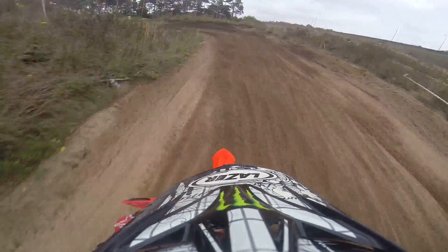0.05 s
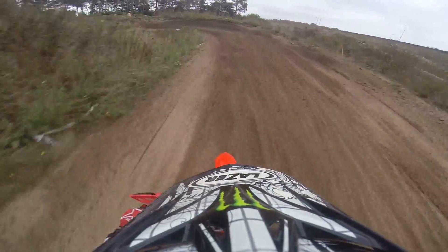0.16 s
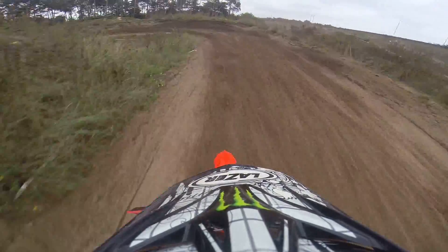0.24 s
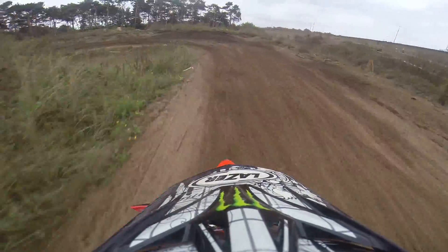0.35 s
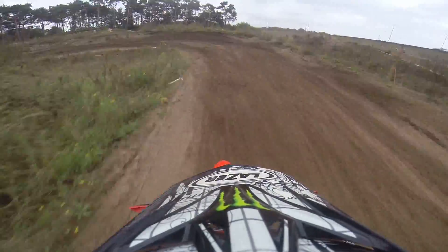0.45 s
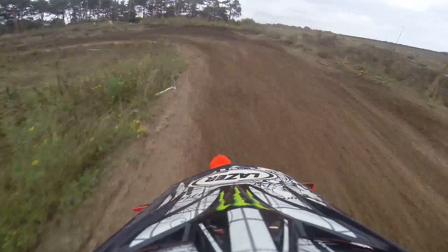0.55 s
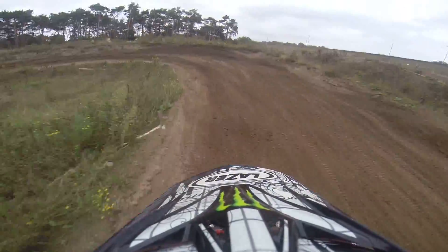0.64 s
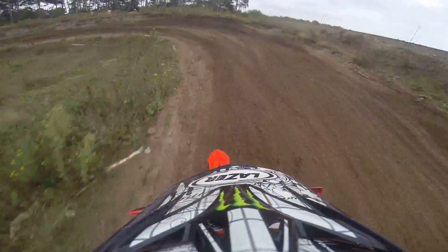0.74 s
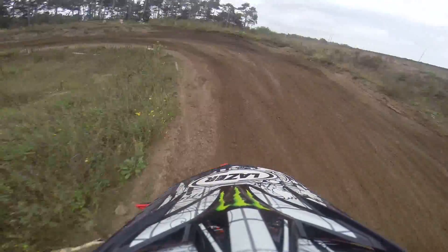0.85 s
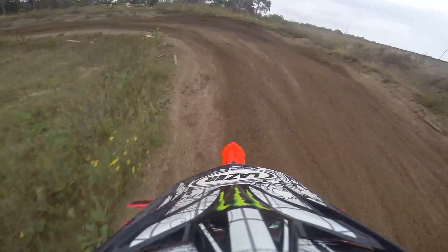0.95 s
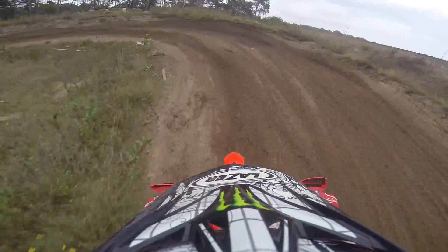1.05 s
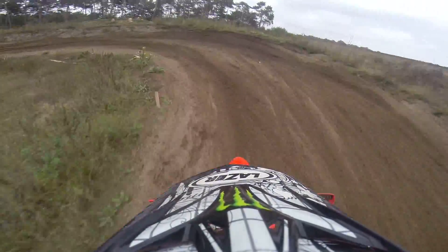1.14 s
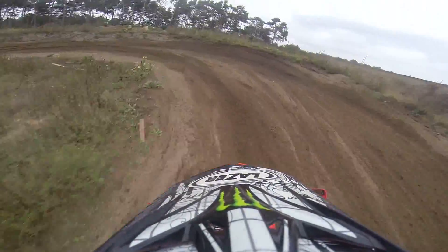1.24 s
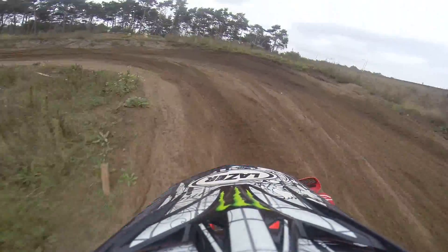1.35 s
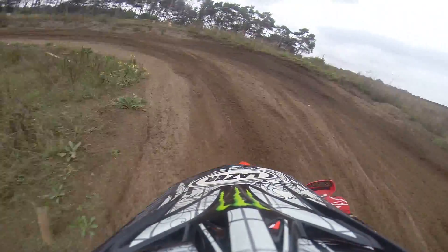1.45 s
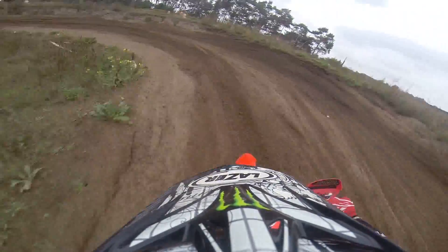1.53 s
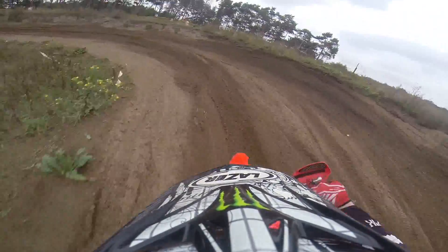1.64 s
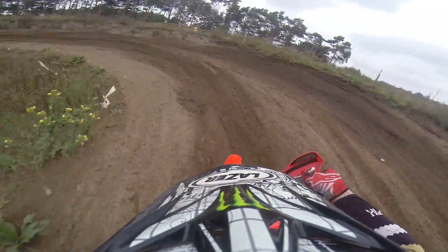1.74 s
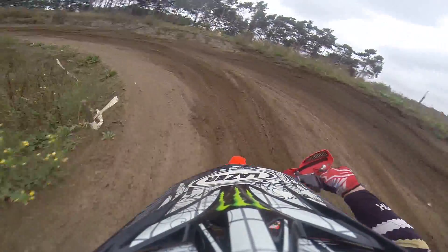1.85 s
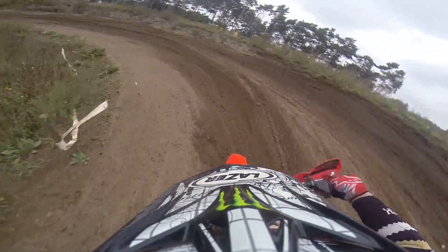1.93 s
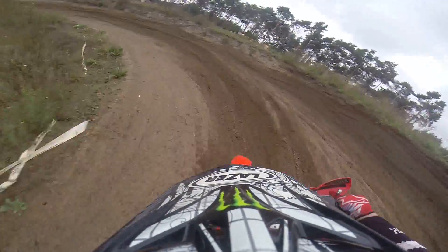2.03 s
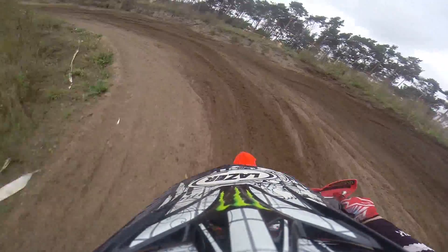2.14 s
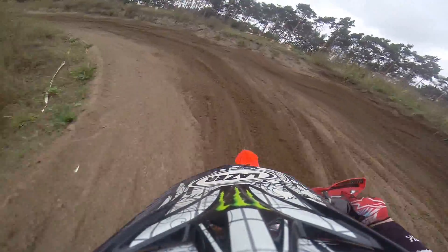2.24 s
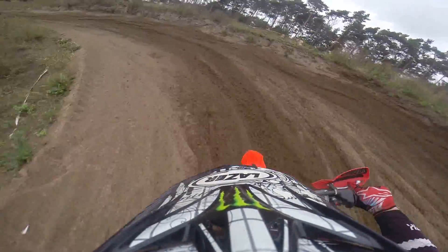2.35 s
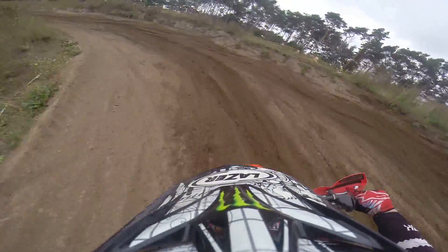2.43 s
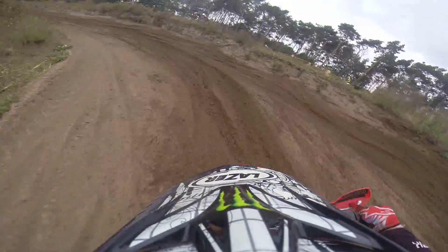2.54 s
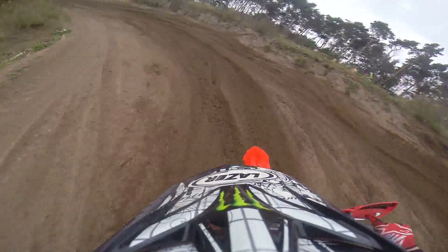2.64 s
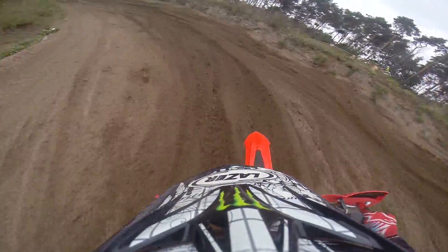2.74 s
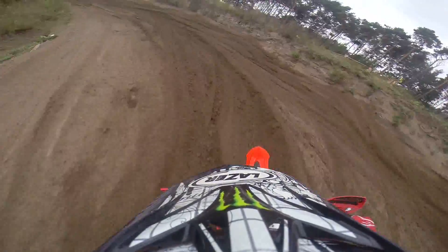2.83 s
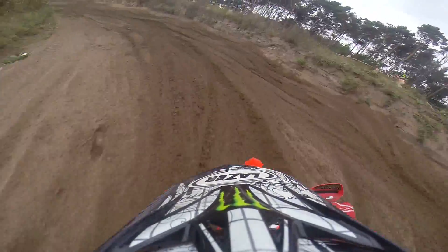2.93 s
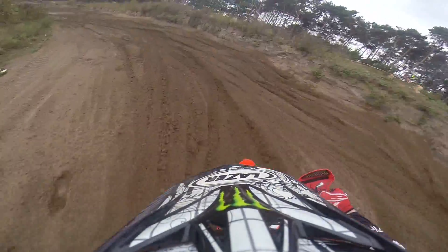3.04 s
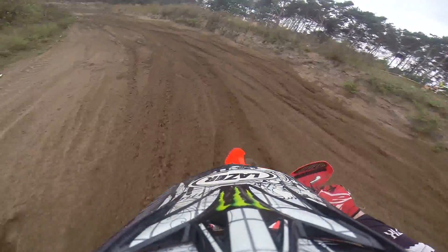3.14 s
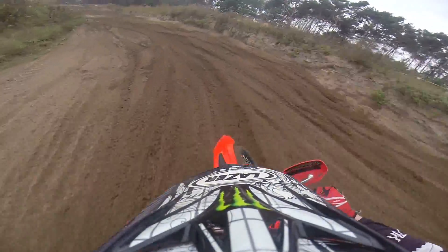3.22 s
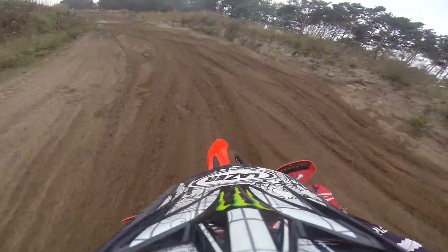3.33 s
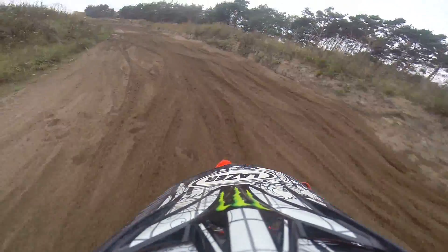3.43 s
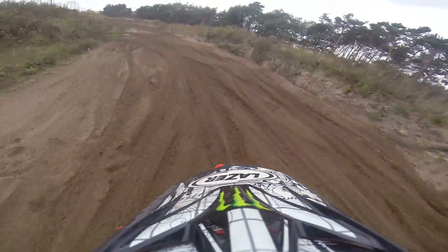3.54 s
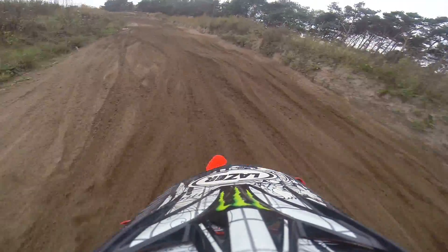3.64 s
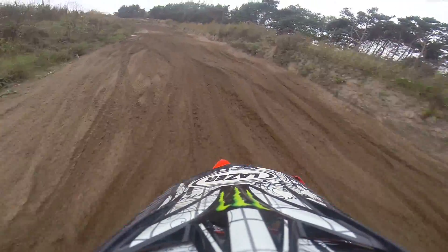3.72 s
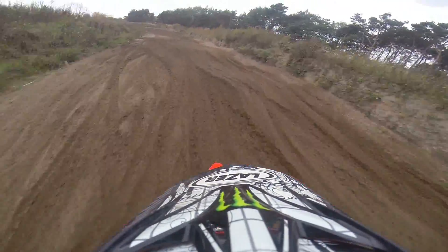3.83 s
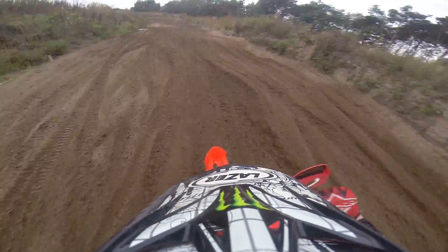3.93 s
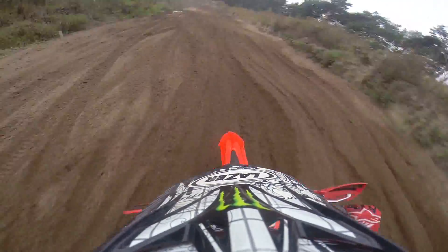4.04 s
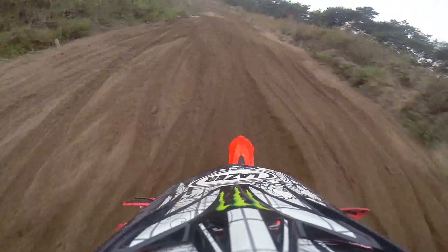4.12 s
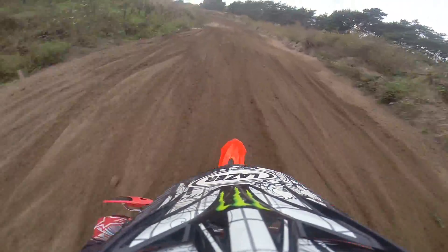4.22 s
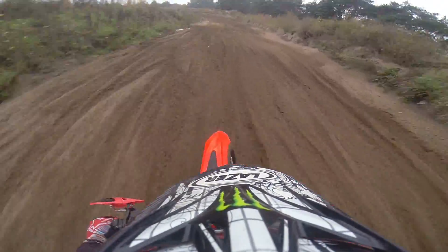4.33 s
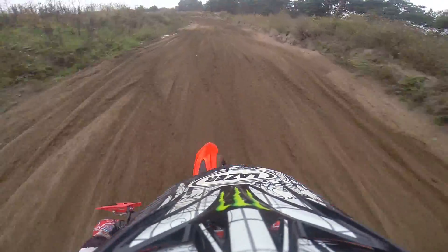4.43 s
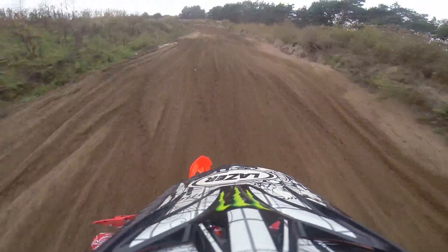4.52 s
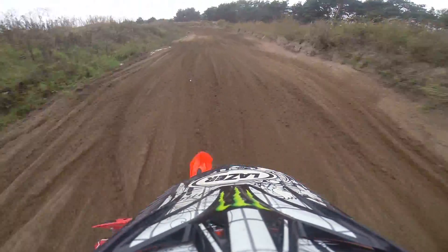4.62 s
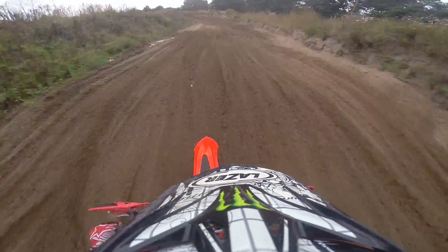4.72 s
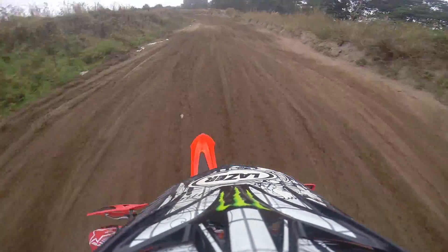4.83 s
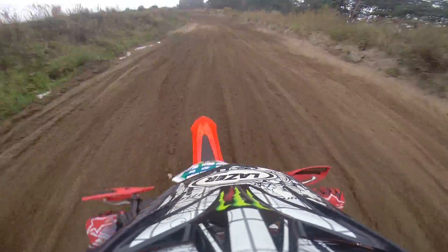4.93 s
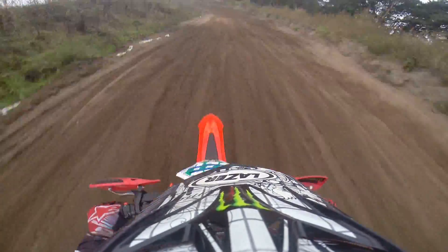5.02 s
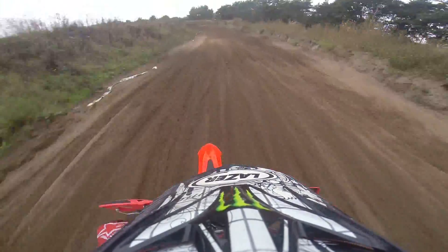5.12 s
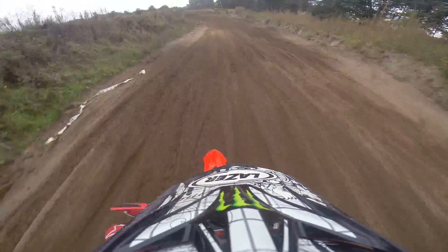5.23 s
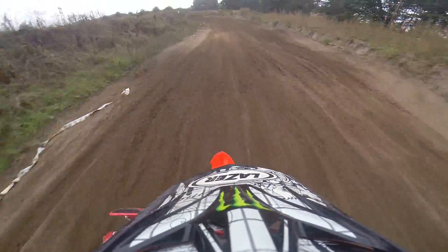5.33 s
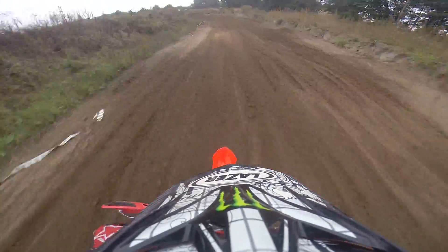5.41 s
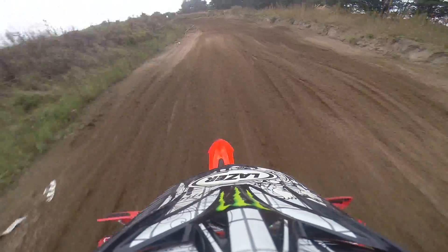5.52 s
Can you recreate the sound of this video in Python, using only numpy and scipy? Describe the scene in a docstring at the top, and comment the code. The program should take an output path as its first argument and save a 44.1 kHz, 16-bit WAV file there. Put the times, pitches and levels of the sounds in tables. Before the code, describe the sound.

Dirt bike coasts into a sandy bend amid gusting wind, pops and blips its throttle, then pulls hard up a straight with climbing revs.

```python
"""A single-cylinder dirt bike rides through a sandy bend, heard at the rider's helmet.
First the engine coasts with a rattling chain while filtered noise makes gusty wind and the rush of the ground.
A bump throws up a burst of grit, then stray firings pop from the silencer, each followed by an airbox gulp.
Two blips of throttle follow, with pops after each: every turn rings the airbox and sends a pulse down the pipe.
Last comes a long pull up the straight, which ends with intake hiss and a clean whine at high revs."""
import sys
import numpy as np
from scipy import signal
from scipy.fft import rfft, irfft, next_fast_len
from scipy.io import wavfile

SR = 44100
rng = np.random.default_rng(int(sys.argv[2]) if len(sys.argv) > 2 else 0)


def pcm_store(signal):
    """Save signal as 16-bit PCM."""
    levels = np.round(np.clip(np.atleast_2d(signal), -1, 1) * 32767)
    wavfile.write(sys.argv[1], SR, levels.astype(np.int16).T)


N = 245637
TIME = np.arange(N) / SR


def amp(db):
    """Turns dB into a linear gain."""
    return 10 ** (np.asarray(db) / 20)


def unit(x):
    """Scales a signal to rms 1."""
    return x / np.sqrt(np.mean(x ** 2) + 1e-20)


def curve(rows, axis=1):
    """Draws one column of a table as straight lines over the whole scene."""
    rows = np.asarray(rows)
    return np.interp(TIME, rows[:, 0], rows[:, axis])


def read(points, hz):
    """Reads a spectrum in dB, interpolated on a logarithmic frequency scale."""
    f, db = np.transpose(points)
    return np.interp(np.log(hz + 1), np.log(f), db)


def colour(x, points):
    """Shapes the spectrum without delay."""
    size = next_fast_len(len(x) + 4096)
    gain = amp(read(points, np.fft.rfftfreq(size, 1 / SR)))
    return irfft(rfft(x, size) * gain, size)[:len(x)]


def ring(points, hz, lift_db=0):
    """Causal (minimum-phase) response with the given spectrum, read at the frequencies hz; one row per pulse."""
    log_gain = np.log(amp(read(points, hz) + lift_db))
    circle = np.concatenate([log_gain, log_gain[..., -2:0:-1]], axis=-1)
    return np.exp(signal.hilbert(circle).conj())[..., :hz.shape[-1]]


def noise(points):
    """Steady noise of rms 1 with the given spectrum."""
    return unit(colour(rng.standard_normal(N), points))


def wander(hz):
    """Slow random drift of rms 1, mostly below hz."""
    lowpass = 1 + (np.fft.rfftfreq(N, 1 / SR) / hz) ** 4
    return unit(irfft(rfft(rng.standard_normal(N)) / lowpass, N))


def clicks(times, sizes):
    """Impulses shared between the two nearest samples."""
    at = np.clip(np.asarray(times) * SR, 0, N - 1)
    low = at.astype(int)
    early = np.bincount(low, sizes * (1 - at % 1), N + 1)
    late = np.bincount(low + 1, sizes * (at % 1), N + 1)
    return (early + late)[:N]


# Openings of the throttle. Each row: start of opening in seconds, fully shut in seconds, whoop peak in dB.
PULLS = [(1.687, 2.13, -14), (2.339, 2.715, -18.5), (2.994, 5.7, -11.5)]


def throttle(open_s=0.054, shut_s=0.083):
    """How far the throttle is open, 0-1, with a ramp at each end."""
    return sum(np.clip(np.minimum((TIME - start) / open_s, (end - TIME) / shut_s), 0, 1)
               for start, end, *_ in PULLS)


# Strength of the headwind, dropping into the bend and building along the straight.
# Each row: time in seconds, strength in dB, which each layer of wind or ground scales its own way.
HEADWIND = [(0, 1), (.45, -1.5), (.62, 1), (.66, 2.5), (.85, -4.5), (1.3, -6.5), (1.52, -4.5), (2.25, -7.5),
            (2.62, -5), (2.74, -9.5), (2.98, -7.5), (3.35, -4), (3.75, -5.5), (5.57, -3.5)]
# Gusts and lulls in the buffeting. Each row: centre in seconds, half width in seconds, boost or cut in dB.
GUSTS = [(.1, 0.14, 4.5), (0.3, 0.04, 9.5), (.54, 0.016, 10.5), (.675, .025, 5), (1.136, 0.036, 11),
         (1.8, 0.071, -22), (2.28, 0.012, 4), (3.2, 0.2, -12.5), (3.85, 0.24, -9.5), (4.55, 0.37, -3.5),
         (5.48, .12, -5.5)]
# Spectra of the low buffeting and the roar. Each row: frequency in Hz, relative level in dB.
BUFFET = [(15, -6.5), (30, -2.5), (60, 2), (110, 0.5), (170, -5), (260, -10), (500, -29), (1200, -76)]
ROAR = [(80, -15), (180, -3), (290, 1), (420, -5.5), (600, -2.5), (800, -7.5), (1050, -11.5), (1400, -17.5),
        (1800, -46), (4000, -74.5)]
# Narrow whistles round the helmet peak. Each row: frequency in Hz, width in Hz, level in dB against the roar.
WHISTLES = [(1046, 41, -21), (2590, 300, -26), (5800, 440, -42.5)]


def wind(buffet_db=-20.5, roar_db=-21.5, buffet_by_wind=0.91, roar_by_wind=0.97, lumps_db=0.5, gusts_db=1.0):
    """Eddies thump the microphone, roar round the helmet and whistle at its edges."""
    roar_by_throttle_db = -4  # the roar is softer while the throttle is open, leaving the engine clear
    headwind = curve(HEADWIND)
    gusts = sum(db * np.exp(-((TIME - s) / width) ** 2) for s, width, db in GUSTS)
    buffet = unit(noise(BUFFET) * amp(lumps_db * wander(25)))
    buffet *= amp(buffet_db + buffet_by_wind * headwind + gusts)
    roar = unit(noise(ROAR) * amp(gusts_db * wander(41)))
    for hz, width, db in WHISTLES:
        peak = signal.iirpeak(hz, hz / width, fs=SR)
        roar += amp(db) * unit(signal.lfilter(*peak, rng.standard_normal(N)))
    return buffet + roar * amp(roar_db + roar_by_wind * headwind + roar_by_throttle_db * throttle())


# Spectra of the tyre and air rush and of the finer sand fizz, both including some engine hiss.
# Each row: frequency in Hz, relative level in dB.
RUSH = [(700, -1.5), (1300, 0.5), (1800, 3.5), (2200, 1.5), (2600, -6), (3200, -3), (3900, -6.5),
        (4700, -22.5), (7000, -55)]
FIZZ = [(3000, -9), (4200, -0.5), (4900, -5.5), (5700, -4), (6600, -3), (7400, -14), (9500, -19.5),
        (12500, -27.5), (15000, -43.5)]


def ground(rush_db=-39.0, fizz_db=-48, rush_by_wind=1.45, fizz_by_wind=2.09, open_throttle_db=2.0,
           flutter_db=1.1, grains_per_s=900, grain_spread_db=10, grain_share=0.18):
    """Tyres and air rush, sand fizzes on the plastics; both include engine hiss, up while the throttle is open."""
    headwind = curve(HEADWIND)
    flutter = amp(flutter_db * wander(68))
    sizes = amp(grain_spread_db * np.minimum(rng.exponential(1, N), 4)) * rng.choice([-1, 1], N)
    grains = unit(colour(sizes * (rng.random(N) < grains_per_s / SR), FIZZ))
    rush = unit(noise(RUSH) * flutter) * amp(rush_db + rush_by_wind * headwind)
    fizz = unit((noise(FIZZ) + grain_share * grains) * flutter) * amp(fizz_db + fizz_by_wind * headwind)
    return (rush + fizz) * amp(open_throttle_db * throttle())


# Burst of grit as the bike hits a bump. Each row: time in seconds, level in dB.
SPRAY_LEVEL = [(.62, -77), (.645, -42), (.66, -42), (.7, -50), (.76, -52), (.8, -75)]
# Spectrum of that grit. Each row: frequency in Hz, relative level in dB.
SPRAY = [(600, -9), (1100, 5), (2000, -1.5), (3300, 3.5), (5000, -14), (8000, -17), (12000, -21.5),
         (15000, -29)]


def spray(grains_per_s=700, spread_db=7):
    """Coarse grit strikes the plastics as random impulses of uneven size."""
    sizes = amp(spread_db * np.minimum(rng.exponential(1, N), 2.5)) * rng.choice([-1, 1], N)
    hits = sizes * (rng.random(N) < grains_per_s / SR)
    return unit(colour(hits, SPRAY)) * amp(curve(SPRAY_LEVEL))


# Short ticks: knocks, flung grit, and the sharp treble snap or ring of single firings.
# Each row: start in seconds, peak in dB, centre of the band in Hz, decay constant in seconds.
TICKS = [(0.171, -22.5, 4300, 0.0018), (.651, -14, 800, .003), (.66, -18, 1020, 0.011),
         (.654, -34, 10000, 0.0023), (.668, -34, 6000, 0.0027), (.693, -23, 3260, 0.0033),
         (0.758, -39, 10000, 0.0018), (.606, -51, 5000, 0.0026), (.647, -38, 3470, 0.019),
         (0.853, -27, 2120, 0.0044), (1.092, -24, 2000, 0.005), (1.152, -42, 5000, 0.005),
         (1.2581, -50, 6000, .006), (1.275, -29, 900, .003), (1.43, -40.5, 4500, .004),
         (1.432, -48, 9500, .003), (1.553, -47, 8900, .002), (1.598, -49, 9300, .002),
         (1.639, -46, 9500, .002), (1.535, -23.5, 1500, .004), (1.628, -36, 1950, .002),
         (1.667, -28, 1950, .002), (2.184, -48, 9500, .002), (2.218, -51, 9500, .002),
         (2.251, -50, 9500, 0.0018), (2.758, -47, 9000, 0.0012), (2.8535, -45, 5000, .002),
         (2.9094, -47, 7500, .003)]


def ticks():
    """Short, broadly tuned noise bursts that die at once."""
    out = np.zeros(N)
    for s, db, hz, decay in TICKS:
        burst = rng.standard_normal(N) * (TIME >= s) * np.exp(-abs(TIME - s) / decay)
        band = signal.butter(3, [hz / 1.3, hz * 1.3], "band", fs=SR, output="sos")
        tick = signal.sosfilt(band, burst)
        out += amp(db) * tick / abs(tick).max()
    return out


# Slack chain while the bike coasts. Each row: time in seconds, level in dB.
RATTLE_LEVEL = [(0, -35.5), (.4, -40), (.58, -37.5), (.67, -43), (.88, -44), (1.5, -48.5), (1.8, -71)]
# Ring of the chain. Each row: frequency in Hz, relative level in dB.
RATTLE = [(400, -14.5), (700, -3), (1050, 5.5), (1500, -6.5), (2000, -8), (2570, -2.5), (3100, -6),
          (4500, -18.5), (5800, -17.5), (9000, -29.5), (15000, -49.5)]


def rattle(knocks_per_s=260, spread_db=3.0, die_s=0.0054):
    """Coarse, uneven knocks of the slack chain, each a dying puff of noise."""
    sizes = amp(spread_db * np.minimum(rng.exponential(1, N), 3)) * (rng.random(N) < knocks_per_s / SR)
    decays = signal.lfilter([1], [1, -np.exp(-1 / (die_s * SR))], sizes)
    bursts = decays * rng.standard_normal(N)
    return unit(colour(bursts, RATTLE)) * amp(curve(RATTLE_LEVEL))


# Spectrum of one stray firing from the silencer. Each row: frequency in Hz, relative level in dB.
POP = [(40, -10.5), (150, 15.5), (280, 13), (550, 11), (680, 13.5), (830, -15), (1100, -13.5),
       (1420, -11.5), (1700, -33.5), (2050, -27.5), (2500, -37.5), (4000, -60.5)]


def exhaust(kicks, echo_s=0.00357, echo=0.79):
    """A short pop from the silencer and its reflection."""
    peak = colour(signal.unit_impulse(4096), POP).max()
    pulse = colour(kicks, POP) / peak
    return pulse + echo * np.interp(TIME - echo_s, TIME, pulse)


# Single hard firings, most of them with the throttle shut.
# Each row: time in seconds, relative level in dB, extra bass in dB, level of the following gulp in dB.
POPS = [(0.691, -13.5, 4, -28), (0.736, -20, 6, -14), (0.7576, -8.5, 8.5, -18), (0.7745, -3.5, 4, -20),
        (0.822, -5, 3.5, -18.5), (0.9675, -5.5, 4.5, -26), (1.147, -3.5, 2.5, -20), (1.396, -11.5, -6, -44),
        (1.43, -2, -2.5, -22), (1.508, -8.5, -2, -13), (1.5512, -0.5, -2, -8.5), (1.596, -0.5, -5, -12),
        (1.638, -2.5, -3.5, -11), (1.6757, -4.5, 0.5, -18), (1.7118, -6, -1, -15.5), (2.1135, -8, 0, -18),
        (2.1483, -4.5, -3.5, -23), (2.1837, -3.5, -1.5, -22), (2.2177, -3, -0.5, -23),
        (2.2495, -3, -0.5, -19), (2.3176, -6.5, 1, -13.5), (2.38, -6, -1, -28), (2.758, -12.5, 1, -35),
        (2.833, -8.5, 0, -22), (2.9082, -8, 4, -25), (2.982, -7, 2.5, -18), (3.0195, -3, -1, -31),
        (3.0616, -5, -2, -24)]


def overrun(pop_db=1.5, gulp_hz=305, gulp_lag_s=0.021, gulp_s=0.0086, crack_db=-34, crack_s=0.0024,
            clang_db=-26, clang_hz=1450, clang_s=0.0036):
    """Stray firings pop with a faint crack, the hardest make the pipe clang; about a turn later the airbox gulps."""
    s, db, bass_db, gulps_db = np.transpose(POPS)
    kicks = clicks(s, amp(db))
    lowpass = signal.butter(3, 400, fs=SR, output="sos")
    bass = signal.sosfiltfilt(lowpass, clicks(s, amp(db) * (amp(bass_db) - 1)))
    crack = signal.lfilter([1], [1, -np.exp(-1 / (crack_s * SR))], kicks)
    crack *= noise([(600, -19.0), (1500, 17.5), (4000, -0.5), (8000, -12), (12000, -25)])
    t = TIME[:SR // 10]
    clang = np.sin(2 * np.pi * clang_hz * t) * np.exp(-t / clang_s)
    clangs = signal.oaconvolve(clicks(s, amp(2 * db)), clang)[:N]  # doubled dB favours the hardest pops
    gulp = np.sin(2 * np.pi * gulp_hz * t) * np.exp(-((t - gulp_lag_s) / gulp_s) ** 2)
    gulps = signal.oaconvolve(clicks(s, amp(gulps_db)), gulp)[:N]
    return amp(pop_db) * exhaust(kicks + bass) + amp(crack_db) * crack + amp(clang_db) * clangs + gulps


def whoop(from_hz=350, to_hz=235, delay_s=0.021, length_s=0.0797):
    """As the throttle opens, the ring of the airbox swoops down."""
    out = np.zeros(N)
    for start, *_, db in PULLS:
        progress = np.clip((TIME - start - delay_s) / length_s, 0, 1)
        hz = from_hz + (to_hz - from_hz) * progress
        swell = np.sin(np.pi * progress ** 0.51)
        out += amp(db) * swell * np.sin(2 * np.pi * np.cumsum(hz) / SR)
    return out


def whine(turns, spectrum, count=60):
    """Clean orders of the crank: sines at whole multiples of its speed, shaped by a spectrum."""
    orders = sum(np.sin(2 * np.pi * (k * turns + rng.random())) for k in range(1, count))
    return unit(colour(orders, spectrum))


# How the engine breathes. Each row: time in seconds, intake in dB, exhaust in dB, exhaust lag in turns,
# airbox pitch factor, pipe pitch factor, rasp in dB (each layer scales the rasp its own way).
LOAD = [(1.7, 1, 3, 0.45, 0.96, 0.97, -13), (1.77, -6.5, 1.9, 0.42, 1.06, 0.96, -1.5),
        (1.9, 0.5, 1.3, 0.43, 1.005, 1, -4.6), (2.03, -2.5, -2, 0.46, 1.08, 0.94, -8),
        (2.1, 2.5, -8, 0.5, 1, 1.06, -7.5), (2.35, 0, -0.5, 0.39, 1.1, 1, -9),
        (2.42, -1.9, 1, 0.41, 0.91, 0.97, -3.2), (2.5, 1, 4, 0.36, 0.91, 0.92, -4),
        (2.57, -2, 1, 0.33, 1.07, 0.93, -1.5), (2.69, 0, -1.5, 0.39, 1.18, 1.05, -0.5),
        (3.02, -1.5, 3.5, 0.28, 0.97, 1.02, -5), (3.1, 0.7, 1.3, 0.43, 0.92, 0.88, -5),
        (3.2, -3.5, 2.7, 0.44, 1.02, 0.98, 1), (3.29, -1.5, 0.5, 0.4, 1.14, 0.96, -0.5),
        (3.36, -2, -0.5, 0.44, 1.27, 1.02, 2.5), (3.48, -2.5, 0.8, 0.45, 1.14, 1.04, -0.5),
        (3.56, 1, 1, 0.45, 0.99, 0.97, -2), (3.64, -2, 2.5, 0.43, 0.94, 0.94, -4.5),
        (3.74, -3, 0.5, 0.43, 0.97, 0.94, -3.5), (3.82, -0.5, 2.7, 0.37, 1, 1.04, 1.5),
        (3.9, 0.7, 0.5, 0.44, 1.11, 1.19, -3), (3.97, 0.3, -3, 0.5, 1.09, 1.24, 0),
        (4.12, -0.8, -5.5, 0.41, 1.21, 0.96, -8), (4.25, 0.7, -2, 0.397, 0.96, 0.954, -1.5),
        (4.44, 3.5, 2, 0.43, 1.02, 0.92, -7.5), (4.51, 3, 2.5, 0.44, 1.02, 0.99, 0),
        (4.6, 4.5, 0.5, 0.47, 0.96, 1.1, 1), (4.7, 3.5, -0.5, 0.43, 0.99, 1.04, 3.5),
        (4.84, 3, -9.5, 0.46, 1, 1.11, -0.5), (4.94, 2.5, -7, 0.5, 1.01, 1.12, -2.5),
        (5.06, 2.5, -12.5, 0.38, 0.97, 1.08, -4), (5.2, 3, -1.5, 0.44, 1, 0.97, -4),
        (5.33, 5.5, -1, 0.38, 0.96, 1.02, -1.5), (5.43, 4, -3, 0.39, 1, 0.96, -3),
        (5.55, 6.5, -1, 0.396, 1.006, 1.05, -4)]
# Overtones of the pipe's shell. Each row: frequency in Hz, relative level in dB.
SHELL = [(750, -31.5), (930, 1.5), (1080, 2), (1190, -0.5), (1330, 0), (1490, 1), (1620, -24.5),
         (1790, -10.5), (1890, -17), (2010, -11), (2200, -21), (2470, -13.5), (2700, -30.5), (5000, -49.5)]


def shell(turns, shell_db=-38, by_rasp=0.77):
    """The shell of the pipe sings along with the crank, louder with more rasp."""
    return whine(turns, SHELL) * amp(shell_db + by_rasp * curve(LOAD, axis=6))


# Engine speed. Each row: time in seconds, firings per second (one a turn).
SPEED = [(0, 76.3), (.78, 61.5), (1.55, 44), (1.7, 60.1), (1.72, 60.9), (1.75, 67.5), (1.78, 70.3),
         (1.88, 57.8), (2.05, 63.7), (2.11, 56.7), (2.35, 56.2), (2.39, 50.2), (2.42, 53.4), (2.5, 55.7),
         (2.56, 65.6), (2.59, 69.3), (2.69, 68.4), (3.03, 56.8), (3.07, 53.1), (3.12, 61.7), (3.16, 66.7),
         (3.29, 61.9), (3.38, 55.0), (3.5, 53.6), (3.6, 64.1), (3.68, 69.5), (3.69, 70.2), (3.74, 63.2),
         (3.81, 71.9), (3.89, 73.1), (3.94, 69.3), (4.05, 67.6), (4.1, 63.7), (4.18, 66.2), (4.22, 71.8),
         (4.27, 69.3), (4.4, 73.0), (4.47, 72.0), (4.6, 85.4), (4.66, 85.0), (4.73, 87.9), (4.78, 85.2),
         (4.82, 88.6), (4.86, 86.0), (4.91, 93.8), (4.96, 82.0), (5.0, 81.0), (5.04, 76.1), (5.14, 86.2),
         (5.19, 83.6), (5.32, 107.3), (5.35, 110.5), (5.39, 110.5), (5.43, 115.6), (5.48, 113.5),
         (5.52, 117.0), (5.55, 117.4)]
# Rings of the airbox and intake tract, of the cylinder fins, and the silencer's pulse under power.
# Each row: frequency in Hz, relative level in dB.
AIRBOX = [(45, -19.5), (110, -28.5), (170, -25.5), (220, -19), (262, -14), (320, -15.5), (385, -28.5),
          (460, -19.5), (570, -36), (670, -28), (770, -35.5), (860, -34), (1000, -42), (1200, -51),
          (1400, -42), (1520, -45), (1640, -71.5), (1850, -55.5), (2100, -58), (4000, -85)]
FINS = [(1000, -83.5), (1600, -78.5), (1780, -64.5), (1900, -73), (2020, -58.5), (2200, -76.5),
        (2470, -66.5), (3000, -78), (4200, -77), (7000, -102.5)]
SILENCER = [(40, -52.5), (150, -55), (280, -18), (420, -46.5), (500, -28), (570, -28.5), (660, -23),
            (790, -37.5), (900, -50), (1100, -61), (1420, -54.5), (1700, -81.5), (4000, -97.5)]


def firings(turns, echo=0.4, low_cut_hz=150, fins_db=3, fins_by_rasp=0.84, size=2048):
    """Each turn, a gulp rings the airbox; part of a turn later the exhaust port opens and the pipe echoes."""
    echo_s, jitter_s, intake_spread_db, exhaust_spread_db = .00392, .00001, .2, .5
    times = np.interp(np.arange(1, int(turns[-1])), turns, TIME)
    late, gulp, blast = rng.standard_normal((len(times), 3)).T[:, :, None]  # chance in each firing
    rate = np.interp(times, *np.transpose(SPEED))[:, None]
    knots, *columns = np.transpose(LOAD)
    breath = [np.interp(times, knots, c)[:, None] for c in columns]
    intake_db, exhaust_db, lag, pitch, pipe_pitch, rasp_db = breath
    hz = np.fft.rfftfreq(size, 1 / SR)

    def delay(s):
        return np.exp(-2j * np.pi * hz * s)

    # pitch shifts the airbox fully below 600 Hz; rasp lifts it fully above 1200 Hz
    airbox_hz = hz / pitch ** read([(600, 1), (1100, 0)], hz)
    intake = ring(AIRBOX, airbox_hz, rasp_db * read([(400, 0), (1200, 1)], hz))
    intake += ring(FINS, hz) * amp(fins_db + fins_by_rasp * rasp_db)
    pipe = ring(SILENCER, hz / pipe_pitch) * delay(lag / rate)
    pipe = pipe * (1 + echo * delay(echo_s / pipe_pitch))  # hotter gas tunes the pipe up
    both = intake * amp(intake_db + intake_spread_db * gulp) - pipe * amp(exhaust_db + exhaust_spread_db * blast)
    # slower turns give stronger pulses
    pulses = irfft(both * delay(times[:, None] % (1 / SR) + jitter_s * late)) * SR / (2 * rate)
    places = (times * SR).astype(int)[:, None] + np.arange(size)
    gas = np.bincount(places.ravel(), pulses.ravel(), N)[:N]
    band = signal.butter(3, [low_cut_hz, 4500], "band", fs=SR, output="sos")
    return signal.sosfiltfilt(band, gas)  # small openings radiate little deep bass


# Faint pumping with the throttle shut. Each row: time in seconds, level in dB against open throttle.
COAST_LEVEL = [(0, -27), (.45, -24), (.72, -13), (.9, -20.5), (1.5, -29), (1.7, -46)]
# Hum at twice the engine speed. Each row: time in seconds, peak at open throttle in dB.
HUM_LEVEL = [(1.7, -29), (3.2, -31.5), (3.33, -22), (3.45, -27), (3.6, -31), (5.5, -34)]
# Shared level of hiss and whine at high revs. Each row: time in seconds, level in dB before their own trims.
SUCTION_LEVEL = [(5.28, -66), (5.37, -44.5), (5.45, -41), (5.57, -39.5)]
# Spectra of the turbulent gas in each turn, the hiss of the wide-open carburettor and the high-rev whine.
# Each row: frequency in Hz, relative level in dB.
PUFF = [(60, -25.5), (180, -5.5), (270, -4.5), (400, -9.5), (650, -16.5), (900, -7), (1200, 8), (1480, 5.5),
        (1650, -12), (3000, -34.5), (6000, -67)]
SUCTION = [(1200, -16), (1800, 4.5), (2800, -4.5), (3700, -0.5), (4300, 0.5), (4800, -14.5), (5500, -8.5),
           (7000, -14), (9500, -21), (13000, -24.5)]
WHINE = [(800, -25), (1030, 7), (1150, -6), (1270, 8), (1480, -8), (1620, 3), (1740, 2), (1900, -14),
         (2200, -4), (2600, -16), (3000, -8), (3500, -16), (3950, -9), (4350, -8), (4700, -30), (5350, -16),
         (5700, -16), (6500, -30), (9000, -44)]


def engine(pulses_db=0, puff_by_rasp=0.29, puff_by_intake=0.2):
    """Intake and exhaust pulses alternate, with a puff of turbulent gas each turn; high revs hiss and whine."""
    puff_db, hiss_db, whine_db = -48.5, -3.5, 5.5
    turns = np.cumsum(curve(SPEED)) / SR
    opening = throttle()
    pulses = amp(pulses_db) * firings(turns) * (opening + amp(curve(COAST_LEVEL)))
    hum = amp(curve(HUM_LEVEL)) * np.sin(4 * np.pi * turns)  # two pulses a turn
    # the gas hisses most at the start of each turn, then fades
    puffs = (0.88 + np.exp(-(turns % 1) / 0.42)) * rng.standard_normal(N)
    gas_db = puff_db + puff_by_intake * curve(LOAD, axis=1) + puff_by_rasp * curve(LOAD, axis=6)
    gas = unit(colour(puffs, PUFF)) * amp(gas_db)
    high_revs = amp(hiss_db) * unit(colour(puffs, SUCTION)) + amp(whine_db) * whine(turns, WHINE)
    return pulses + (gas + hum + shell(turns)) * opening + high_revs * amp(curve(SUCTION_LEVEL))


def scene():
    """Wind, ground, chain and engine as heard at the helmet, in one channel."""
    surroundings = wind() + ground() + spray() + ticks() + rattle()
    return (surroundings + overrun() + whoop() + engine())[None]


def record(dry, ceiling=.86, cutoff_hz=14400):
    """The loudest peaks are rounded off; then a low-pass limits the band."""
    rounded = dry / (1 + (dry / ceiling) ** 8) ** (1 / 8)
    lowpass = signal.firwin(511, cutoff_hz, window=("kaiser", 9), fs=SR)
    return signal.oaconvolve(rounded, lowpass[None], "same")


dry = scene()
out = record(dry)
pcm_store(out)
```